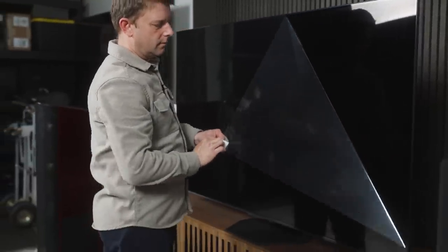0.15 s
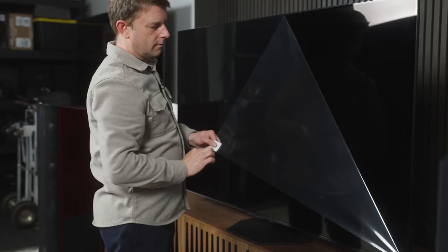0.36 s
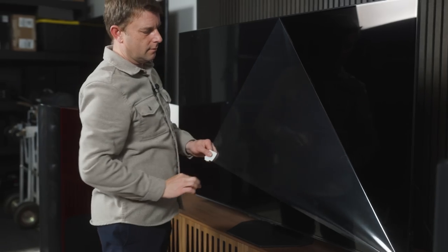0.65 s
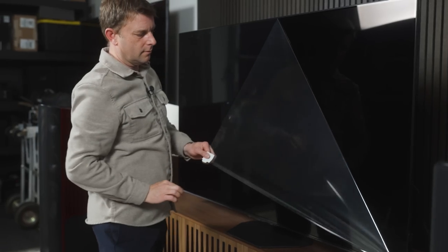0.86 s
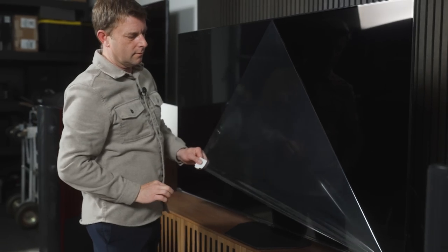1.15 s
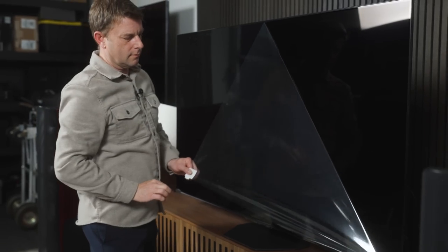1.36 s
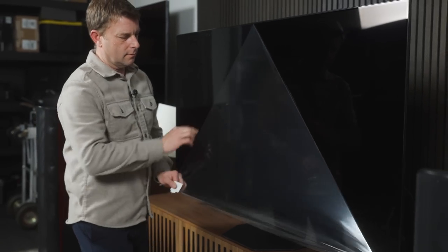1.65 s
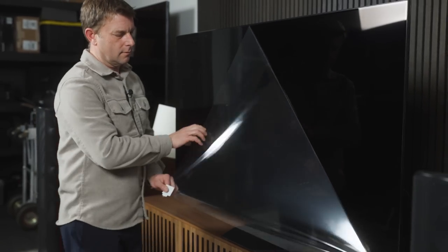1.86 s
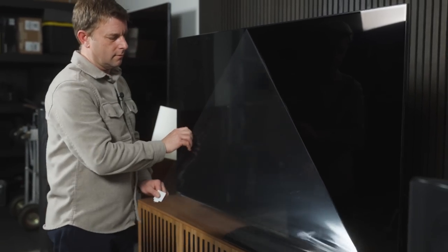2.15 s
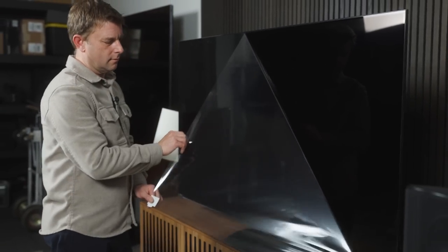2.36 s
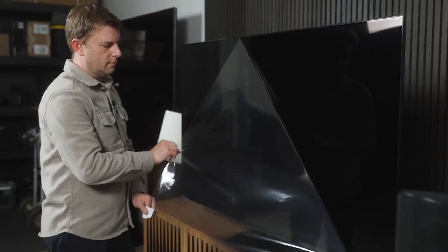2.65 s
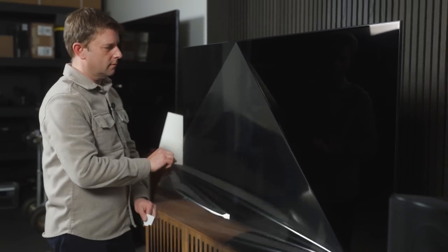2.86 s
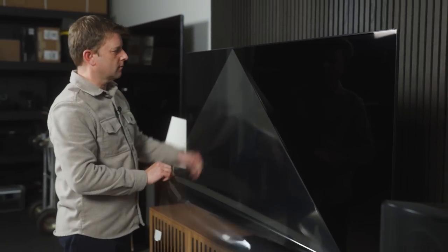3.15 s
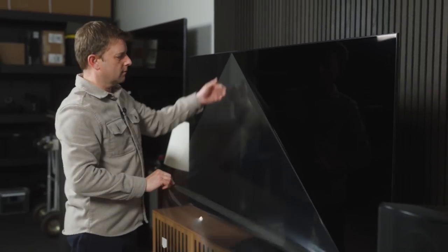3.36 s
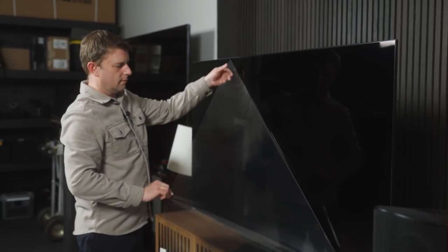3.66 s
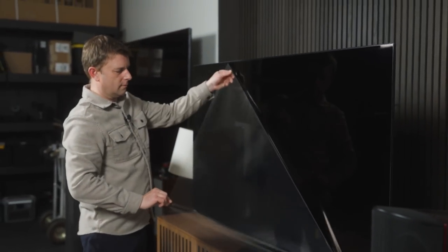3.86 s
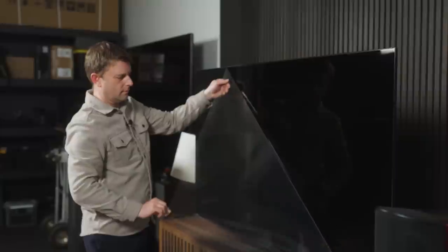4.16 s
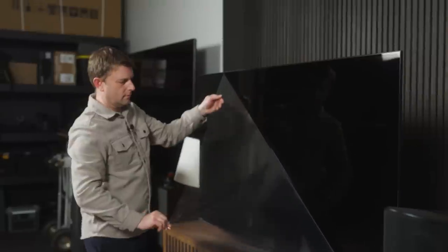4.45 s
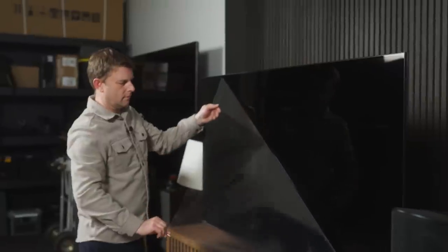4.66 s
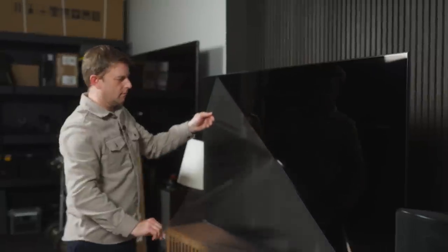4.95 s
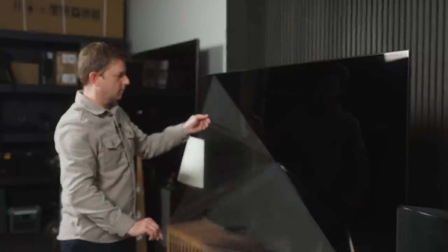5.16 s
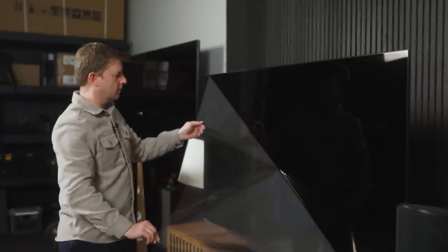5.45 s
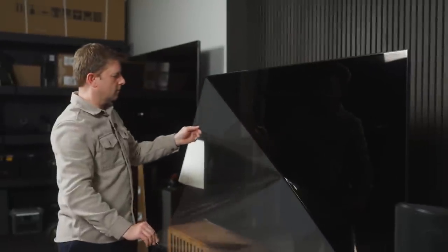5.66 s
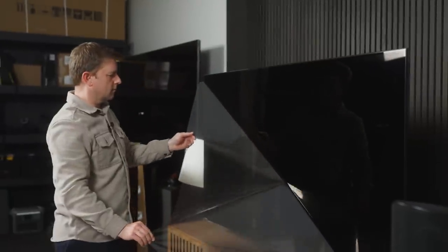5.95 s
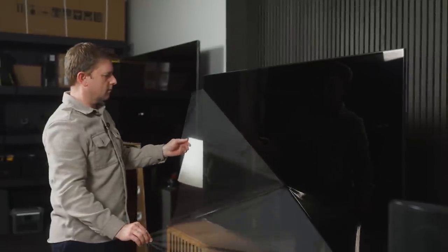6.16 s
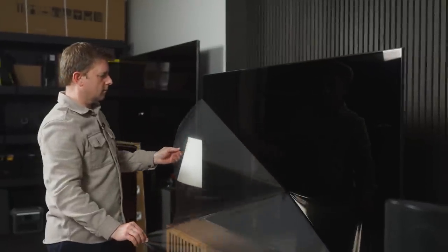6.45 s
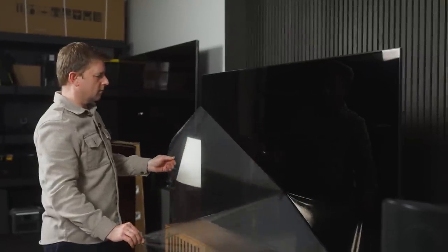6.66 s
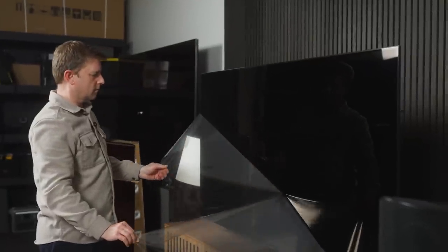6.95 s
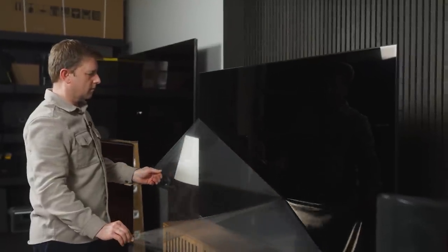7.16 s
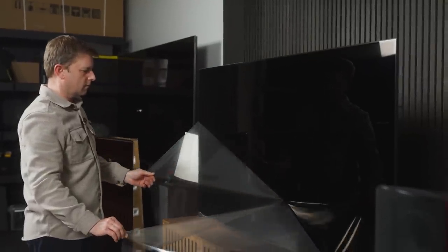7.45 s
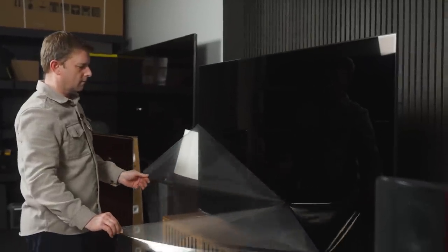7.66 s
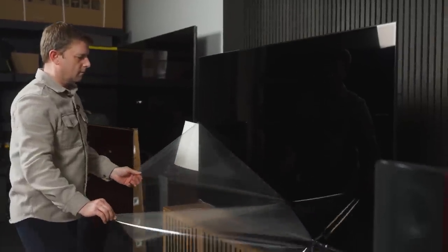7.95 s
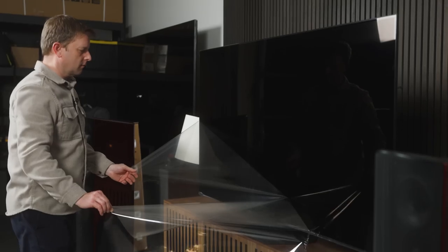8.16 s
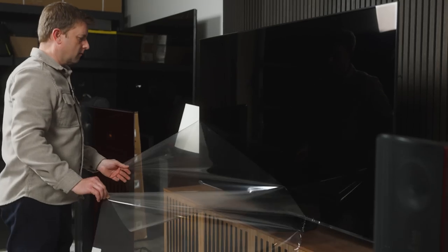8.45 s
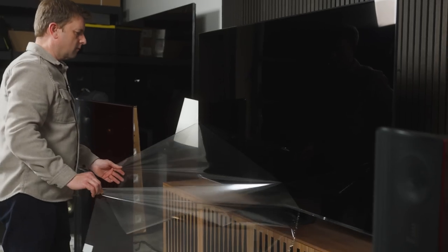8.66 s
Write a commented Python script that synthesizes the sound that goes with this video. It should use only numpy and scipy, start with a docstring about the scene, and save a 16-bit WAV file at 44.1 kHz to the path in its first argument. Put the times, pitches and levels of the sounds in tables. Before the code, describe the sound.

A protective plastic film is peeled from a large glass screen. Quiet ticks and soft handling rustle give way to bright adhesive snaps and a crackling rip with tiny squeaks. After a quieter pause the peel resumes in bursts, and the freed sheet rattles more fully, ending in loud, dense crinkling. Close clip-on microphone, small fairly dry room, very faint ventilation rumble and hiss.

```python
"""Protective plastic film is pulled off a large screen in a small, fairly dry room.
Adhesive bonds break as random pops: short rips first, then one long crackling peel driven by swells of effort.
The pops shake the freed sheet, which rattles like a drumskin; fast stick-slip gives gliding squeaks.
Buckling creases snap as short decaying cycles, loose film swishes as filtered grains, and tugs bump the sheet.
A wall echo and a diffuse tail surround it, over low ventilation rumble, faint hiss and mains hum."""
import sys
import numpy as np
from scipy import signal
from scipy.fft import rfft, irfft, next_fast_len
from scipy.io import wavfile
from scipy.ndimage import uniform_filter1d, map_coordinates

SR = 44100
rng = np.random.default_rng(int(sys.argv[2]) if len(sys.argv) > 2 else 0)


def materialize(psi):
    """Save the field psi as 16-bit PCM at rate SR to the path in sys.argv[1].

    A 1-D psi becomes a single channel; in a 2-D psi each row is a channel.
    """
    bounded = np.clip(np.atleast_2d(psi).T, -1, 1)
    quanta = np.round(bounded * 32767).astype(np.int16)
    wavfile.write(sys.argv[1], SR, quanta)


N = 388521  # samples
TOP_HZ = 16300  # upper limit of the sound

# short bursts of rattle and crackle, strong or faint: adhesive giving way, or loose film crinkling in
# the hands: (time [s], length [s], relative sheet level [dB], relative adhesive level [dB])
RIPS = [(0.116, 0.006, -55, -52.5), (0.129, 0.0075, -42, -46.5), (0.148, 0.0045, -52, -72),
        (0.447, 0.00509, -82, -67), (0.49, 0.025, -56, -82), (0.73, 0.01, -48, -43),
        (0.741, 0.0091, -37.5, -52.5), (0.794, 0.0042, -32, -31), (0.849, 0.009, -49, -29),
        (0.892, 0.0057, -38.5, -36), (0.944, 0.0077, -38.5, -33.5), (0.96, 0.008066, -54.5, -28),
        (0.988, 0.004, -32, -31), (1.015, 0.0044, -34, -26.5), (1.222, 0.006494, -46, -39.5),
        (1.25, 0.019, -54, -46.5), (1.2993, 0.003, -35, -29), (1.357, 0.0032, -51, -31.5),
        (1.718, 0.0022, -52, -34.5), (1.722, 0.0051, -35, -24), (1.856, 0.023, -33, -27.5),
        (1.898, 0.019, -39, -41), (1.928, 0.0031, -37, -29), (1.971, 0.0031, -51, -32),
        (1.996, 0.0056, -49, -29.5), (2.039, 0.0012, -29.5, -27), (2.063, 0.0021, -29.5, -26),
        (2.075, 0.0049, -40, -29), (2.086, 0.0029, -41, -26), (2.102, 0.0034, -36, -29),
        (2.152, 0.0053, -36, -28), (2.17, 0.0017, -36, -27), (2.191, 0.0033, -38, -32),
        (2.203, 0.0023, -42, -28), (2.24, 0.004, -45, -30.5), (2.288, 0.0059, -42, -29.5),
        (2.333, 0.0059, -43, -35), (2.388, 0.003, -37, -30.5), (2.435, 0.0073, -50, -39),
        (2.525, 0.004, -46, -35), (2.554, 0.0037, -39, -33), (2.596, 0.0063, -39.5, -43),
        (2.734, 0.017, -48.5, -51), (2.824, 0.008, -57, -54), (2.9323, 0.011, -46.5, -50.5),
        (3.161, 0.013, -46.5, -47), (3.275, 0.013, -61, -41.5), (3.301, 0.022, -63, -40.5),
        (3.397, 0.0043, -50, -38), (3.423, 0.014, -51.5, -40.5), (3.547, 0.0097, -44, -43),
        (3.56, 0.02, -43, -36.5), (3.62, 0.011, -46, -36.5), (3.708, 0.012, -40, -31.5),
        (3.754, 0.0077, -48, -32.5), (3.826, 0.012, -41.5, -32), (3.871, 0.013, -56, -35),
        (3.927, 0.011, -39.5, -32.5), (3.962, 0.018, -43.5, -32), (4.013, 0.015, -41.5, -33.5),
        (4.044, 0.01884, -43.5, -35.5), (4.116, 0.01062, -41.5, -34.5), (4.181, 0.0046, -37.5, -29.5),
        (4.429, 0.0084, -40, -42), (4.44, 0.0066, -35, -38), (4.452, 0.0092, -37.5, -39.5),
        (4.52, 0.0088, -54, -41.5), (4.548, 0.0079, -32, -43), (4.561, 0.0075, -36, -37),
        (4.604, 0.008, -30, -30.5), (4.669, 0.006, -31, -47), (4.716, 0.0051, -29.5, -45),
        (4.732, 0.004, -31.5, -42.5), (4.792, 0.008, -33.5, -43), (4.832, 0.006, -28, -30.5),
        (4.874, 0.013, -33.5, -38), (4.888, 0.00745, -34, -47.5), (4.907, 0.0095, -34, -36),
        (4.941, 0.0093, -34.5, -43.5), (4.989, 0.015, -36, -44), (5.018, 0.0036, -35.5, -30),
        (5.038, 0.011, -35, -42), (5.057, 0.012, -43, -35), (5.121, 0.018, -37.5, -45.5),
        (5.147, 0.031, -39, -49.5), (5.25, 0.0055, -35, -45.5), (5.304, 0.005, -38.5, -33),
        (5.363, 0.0063, -48, -47.5), (5.407, 0.01168, -37, -50), (5.429, 0.0081, -36.5, -44.5),
        (5.486, 0.01298, -40, -54.5), (5.518, 0.0046, -47, -49), (5.611, 0.0099, -41.5, -57),
        (5.668, 0.0092, -39, -57), (5.767, 0.011, -55, -46.5), (5.874, 0.0055, -49, -67.5),
        (5.946, 0.0046, -56.5, -89), (5.981, 0.011, -47.5, -43.5), (6.109, 0.01328, -75, -58),
        (6.132, 0.0091, -50.5, -40.5), (6.291, 0.013, -48, -49), (6.336, 0.013, -36, -47.5),
        (6.4, 0.0065, -33.5, -40), (6.429, 0.0057, -35, -40), (6.45, 0.017735, -34, -43.5),
        (6.543, 0.023, -37.5, -39), (6.618, 0.0042, -31, -33.5), (6.801, 0.01825, -31.5, -36.5),
        (6.989, 0.008, -37, -38), (7.084, 0.015, -36.5, -37.5), (7.145, 0.0025, -24.5, -30.5),
        (7.155, 0.0069, -36, -39), (7.222, 0.006, -42, -37), (7.244, 0.016, -33.5, -32),
        (7.277, 0.011, -33, -37), (7.33, 0.007, -35, -39), (7.412, 0.0045, -30, -29.5),
        (7.838, 0.0034, -34, -30), (7.867, 0.0031, -23.5, -27), (7.944, 0.004, -25, -29),
        (8.297, 0.0065, -28, -36), (8.542, 0.0052, -34.5, -38), (8.616, 0.0032, -25.5, -32)]
# colour of the crackle at the peel line: (frequency [Hz], relative level [dB])
ADHESIVE = [(200, -46), (1200, -46), (2600, -3.5), (4200, 7), (7000, 4.5), (10000, 4), (13000, 1),
            (16000, -9.5)]


def amp(db):
    """Decibels to gain."""
    return 10 ** (np.asarray(db) / 20)


def unit(x):
    """Scale to rms 1."""
    return x / np.sqrt(np.mean(x ** 2) + 1e-20)


def along(points, hz):
    """Read a (frequency, value) curve on a log frequency axis."""
    f, v = np.transpose(points)
    return np.interp(np.log(hz + 1), np.log(f + 1), v)


def add(track, s, sound):
    """Mix a sound into a track at time s."""
    part = track[max(round(s * SR), 0):][:len(sound)]
    part += sound[:len(part)]


def wobble(rate):
    """A smooth random curve, rate knots a second."""
    knots = rng.standard_normal(int(N * rate / SR) + 4)
    return map_coordinates(knots, [np.arange(N) * rate / SR], order=2)


def coloured(x, spectrum, size=2048):
    """Causal minimum-phase filter with the given (Hz, dB) spectrum."""
    cepstrum = irfft(np.log(amp(along(spectrum, np.fft.rfftfreq(size, 1 / SR)))))
    # folding the cepstrum forward in time makes the filter causal
    cepstrum[1:size // 2] *= 2
    cepstrum[size // 2 + 1:] = 0
    response = irfft(np.exp(rfft(cepstrum)))
    return signal.oaconvolve(x, response)[:N]


def around(x, hz, ratio):
    """A broad resonance from hz / ratio to hz * ratio."""
    ratio = max(ratio, 1.1)
    edges = [hz / ratio, min(hz * ratio, TOP_HZ)]
    return signal.lfilter(*signal.butter(1, edges, "band", fs=SR), x)


def above(x, hz):
    """High-pass at hz, held between 40 and 1200 Hz."""
    return signal.lfilter(*signal.butter(2, np.clip(hz, 40, 1200), "high", fs=SR), x)


def even(x, size=1100):
    """Keep the fine grain of a texture but hold its running rms, over size samples, near 1."""
    return x / np.sqrt(np.abs(uniform_filter1d(x ** 2, size)) + 1e-9 * np.mean(x ** 2))


def background():
    """Low ventilation rumble and faint hiss from coloured noise, with steady sines for mains hum."""
    # ventilation colour: (frequency [Hz], relative level [dB])
    air_colour = [(20, -9), (42, -8), (65, 0), (110, -12), (250, -26), (600, -33), (1200, -40), (2500, -47),
                  (11000, -47), (16000, -58)]
    # mains hum: (frequency [Hz], rms level [dB])
    hum_tones = [(59, -77), (120, -87)]
    t = np.arange(N) / SR
    hum = np.zeros(N)
    for hz, db in hum_tones:
        hum += amp(db) * np.sqrt(2) * np.sin(2 * np.pi * hz * t + rng.uniform(0, 2 * np.pi))
    air = amp(-71) * unit(coloured(rng.standard_normal(N), air_colour, size=8192))
    return hum + air


def room(x, delay=0.004, count=15, wall_s=0.019, wall_db=-21.5):
    """One near wall answers, then a diffuse tail: each band stores energy and lets it die away, the bass slowest."""
    # reverberation time: (frequency [Hz], 60 dB decay time [s])
    decay_times = [(100, 0.42), (260, 0.3), (700, 0.34), (1900, 0.2), (5000, 0.22107), (13000, 0.31)]
    # reverberation strength: (frequency [Hz], level [dB])
    wet_levels = [(100, 6), (600, -2.5), (2000, -6.5), (5000, -11), (14000, -13)]
    out = np.zeros(N)
    add(out, wall_s, amp(wall_db) * x)
    edges = np.geomspace(50, TOP_HZ, count + 1)
    for low, high in zip(edges, edges[1:]):
        band = signal.butter(3, [low, high], "band", fs=SR, output="sos")
        hz = np.sqrt(low * high)
        keep = amp(-2 * 60 / (along(decay_times, hz) * SR))  # share of energy kept per sample
        noise = rng.standard_normal(N)
        power = signal.sosfilt(band, x + 1e-9 * noise) ** 2
        energy = signal.lfilter([1 - keep], [1, -keep], power)
        tail = np.sqrt(energy) * unit(signal.sosfilt(band, noise))
        add(out, delay, amp(along(wet_levels, hz)) * tail)
    return out


def slackness():
    """How freely the sheet hangs, one value per sample."""
    # loosening of the sheet: (time [s], slackness [0-1])
    hanging = [(3.598, 0), (4.6, 0.46), (6.4, 0.27), (6.6, 0.85), (7.2, 1)]
    return np.clip(np.interp(np.arange(N) / SR, *np.transpose(hanging)), 0, 1)


def pops(rate, spread_db):
    """Tiny bonds break at random moments, a few of them much stronger than the rest."""
    breaks = rng.random(N) < rate / SR
    signs = rng.choice([-1, 1], N)
    return breaks * signs * amp(spread_db * np.clip(rng.standard_normal(N), -3, 3))


def bump(t60=0.06, ratio=1.7, tone=0.18):
    """A tug moves the whole sheet at once: soft low bumps that die away quickly."""
    # tugs on the whole sheet: (time [s], pitch [Hz], level of the dull part before decay [dB])
    tugs = [(0, 98, -49), (0.746, 300, -38), (0.812, 290, -41), (4.439, 190, -46), (4.606, 175, -43),
            (4.876, 175, -44), (5.125, 180.7, -44.5), (5.43, 189, -44), (5.671, 200, -50)]
    out = np.zeros(N)
    t = np.arange(SR // 4) / SR
    for s, hz, db in tugs:
        dull = unit(around(around(rng.standard_normal(len(t)), hz, ratio), hz, ratio))
        decay = amp(db - 60 * t / t60)
        add(out, s, decay * (tone * np.sin(2 * np.pi * hz * t) + dull))
    return out


def swish(level_db=0):
    """Loose film rubs on itself in soft swells of fine-grained hiss; a small fold gives a narrow scuff."""
    # rubbing as the hands shift: (middle [s], length [s], level [dB], lowest frequency [Hz])
    rubs = [(0.548, 0.044, -58, 100), (0.61, 0.047, -64, 99), (1.17, 0.036, -56.5, 150),
            (1.245, 0.034, -60.5, 304), (2.855, 0.056, -58, 500), (3.018, 0.0097, -51, 1300),
            (3.056, 0.039, -46, 1200), (3.309, 0.029, -46.5, 1200), (3.515, 0.059, -59.5, 600),
            (6.243, 0.03, -58.5, 500)]
    # colour of film on film: (frequency [Hz], relative level [dB])
    sliding = [(150, 0), (600, -1), (1000, -8), (1700, -1), (2400, -8.5), (3300, -12), (6000, -16),
               (10000, -33), (16000, -34)]
    t = np.arange(N) / SR
    out = np.zeros(N)
    flutter = amp(level_db + 1.8 * wobble(65))
    rub = flutter * even(coloured(pops(rate=18000, spread_db=11.0), sliding))
    for s, length, db, lowest_hz in rubs:
        near = np.abs(t - s) < 2 * length
        swell = np.exp(-2 * ((t[near] - s) / length) ** 2)
        out[near] += above(rub[near], lowest_hz) * amp(db) * swell
    return out


def snaps(level_db=0, cycles=0.45, shiver_db=-18, shiver_t60=0.012, lowest_hz=300):
    """A crease flips over in about two cycles and leaves the film shivering."""
    # buckling creases: (time [s], level ahead of the bass cut [dB], pitch [Hz])
    creases = [(0.4538, -33, 10420), (0.4932, -12, 10830), (0.67, -52, 7310), (0.7307, -24, 8980),
               (0.7451, -16, 6570), (0.7746, -7, 8200), (0.7984, -18.5, 4930), (0.825, -14.5, 7023),
               (0.8968, -4, 9100), (1.01, -11, 10010), (1.0196, -16.5, 6515), (1.038, -8, 5522),
               (1.2232, -13.5, 6900), (1.302, -15.5, 4900), (1.31, -22, 8010), (1.323, -26.5, 7000),
               (1.3584, -16.5, 5340), (1.689, -36.5, 6000), (1.724, -18.5, 3770), (1.7645, -7.5, 7973),
               (1.888, -17, 8000), (1.9049, -15.5, 6950), (2.365, -9, 9600), (2.5963, -12.5, 8320),
               (2.9297, -32, 12250), (3.04, -35, 10010), (3.062, -31, 5030), (3.369, -27, 10600),
               (3.483, -29, 6300), (3.4989, -18, 5750), (3.803, -24, 5080), (3.8998, -23.5, 5518),
               (4.0462, -12.5, 4900), (4.545, -11.5, 10160), (5.009, -22.5, 6939), (5.134, -7, 10510),
               (5.4048, -9, 10900), (6.2095, -33, 4860), (6.283, -34.5, 9990), (6.3128, -25.5, 6473),
               (6.393, -28, 8100), (6.6174, -15, 5893), (6.807, -15, 5350), (7.144, -14, 6157),
               (7.866, -7, 2323), (7.9442, -7.5, 2497), (7.9934, -8, 6070), (8.017, -14, 6998),
               (8.299, -21, 8057), (8.617, -13, 1776)]
    out = np.zeros(N)
    t = np.arange(SR // 30) / SR
    for s, db, hz in creases:
        u = t * hz / cycles  # the envelope peaks at u = 1
        phase = 2 * np.pi * cycles * (u - 1) + rng.normal(0, 0.66)
        flip = u * np.exp(1 - u) * np.cos(phase)
        shiver = unit(around(rng.standard_normal(len(t)), hz, 1.2)) * amp(shiver_db - 60 * t / shiver_t60)
        add(out, s - cycles / hz, amp(db + level_db) * (flip + shiver))
    # a small crease radiates little bass
    return signal.lfilter(*signal.butter(1, lowest_hz, "high", fs=SR), out)


def squeak(length, first_hz, last_hz, jitter=0.16, wander=0.035):
    """Slips follow each other fast enough to make a rough, gliding tone."""
    u = np.linspace(0, 1, max(int(length * SR), 16))
    drift = np.interp(u, np.linspace(0, 1, 8), rng.standard_normal(8))
    scatter = rng.standard_normal(SR // 10)[:len(u)]  # no two slips take the same time
    hz = first_hz * (last_hz / first_hz) ** u * (1 + wander * drift + jitter * scatter)
    phase = 2 * np.pi * np.cumsum(hz) / SR
    tone = np.zeros(len(u))
    for k in range(1, 8):
        overtone_hz = k * (first_hz + last_hz) / 2
        tone += amp(along(ADHESIVE, overtone_hz)) * (overtone_hz < TOP_HZ) * np.sin(k * phase)
    return unit(tone * np.abs(np.sin(np.pi * u)) ** .5)


def squeaks(level_db=0):
    """The longer squeals of film creeping off the glass by very fast stick-slip."""
    # squeals: (time [s], length [s], first pitch [Hz], last pitch [Hz], rms level [dB])
    squeals = [(0.851, 0.052, 1940, 1907, -38), (0.945, 0.012, 6181, 9400, -30.5),
               (0.964, 0.008, 4203, 4910, -35), (1.382, 0.011, 1969, 1841, -60),
               (1.78, 0.013, 13260, 9297, -37), (2.676, 0.02, 5600, 6800, -42),
               (3.424, 0.015, 1956, 1665, -49)]
    out = np.zeros(N)
    for s, length, first_hz, last_hz, db in squeals:
        add(out, s, amp(db + level_db) * squeak(length, first_hz, last_hz))
    return out


def chirps(count=170):
    """Stray squeaks of a few milliseconds, gliding up or down."""
    out = np.zeros(N)
    for when, life, pitch, glide in rng.random((count, 4)):
        hz = 5500 + 6500 * pitch
        add(out, when * N / SR, squeak(0.0041 + 0.0087 * life, hz, hz * 2 ** (glide - .5)))
    return out


def patchy(x, depth_db, size):
    """The film's folds keep shifting, so each moment rings at other frequencies."""
    z = signal.stft(x, nperseg=size)[2]
    field = uniform_filter1d(rng.standard_normal(z.shape), size=5, axis=0)
    field = uniform_filter1d(field, size=5, axis=1)
    return signal.istft(z * amp(depth_db * unit(field)), nperseg=size)[1][:N]


def sheet(drive):
    """The freed film radiates the pops; its voice shifts as it grows wide and slack."""
    # voice of the sheet under tension: (frequency [Hz], relative level [dB])
    taut_voice = [(35, -40.5), (60, -5), (100, -10), (180, -1), (310, -2), (450, -1), (1000, -4.5),
                  (1500, -4.5), (2100, -0.5), (3000, -9.5), (5000, -25), (16000, -61.5)]
    # voice of the sheet hanging wide: (frequency [Hz], relative level [dB])
    slack_voice = [(35, -37), (60, -20), (100, -16), (170, -8), (380, -6), (600, 0), (900, -1.5),
                   (1550, 1.5), (2100, -2.5), (3000, -15), (5000, -29), (16000, -87)]
    slack = slackness()
    taut_part = (1 - slack) * unit(coloured(drive, taut_voice))
    slack_part = slack * unit(coloured(drive, slack_voice))
    return even(patchy(taut_part + slack_part, depth_db=2.0, size=256))


def adhesive(drive):
    """The bright crackle straight from the peel line."""
    return even(patchy(coloured(drive, ADHESIVE), depth_db=5.0, size=128), size=2200)


def crackles(middle_hz=5800, scatter=0.45, life=0.00023, rough=0.28, spread_db=4.0, count=1300):
    """Threads of adhesive or small wrinkles snap: each is a ragged, brief ring at its own pitch."""
    t = np.arange(SR // 200) / SR
    pitch, size, long = np.clip(rng.standard_normal((count, 3)), -2.2, 2.2).T[:, :, None]
    hz = np.minimum(middle_hz * np.exp(scatter * pitch), TOP_HZ)
    u = t / (life * 2 ** (long / 2))
    raggedness = rough * np.cumsum(rng.standard_normal((count, len(t))), axis=1)
    phase = 2 * np.pi * hz * t + raggedness
    grains = amp(spread_db * size) * u * np.exp(-u) * np.sin(phase)
    where = rng.integers(0, N, (count, 1)) + np.arange(len(t))
    scattered = np.bincount(where.ravel(), grains.ravel(), N)[:N]
    return unit(above(scattered, middle_hz / 2))


def surges(rate, life, steady):
    """The peel line catches and jumps ahead: quick swells of gain on top of a steady share."""
    jumps = np.abs(pops(rate, spread_db=5.0))
    decay = np.exp(-np.arange(SR // 20) / (life * SR))
    swells = signal.oaconvolve(jumps, decay * (1 - decay))[:N]
    return even(steady + unit(swells), size=9000)


def pulling(ease=1.5, roundness=1.4):
    """Guide levels in dB of sheet rattle and adhesive crackle: most pulls are arches of effort."""
    # a pull whose end precedes its fastest moment only rises, lowered by the full fall, then stops:
    # (start [s], fastest [s], end [s], relative rattle level [dB], crackle over rattle [dB], swell [dB])
    pulls = [(0.745, 0.8, 0.85, -45, -20, 5.5), (1.718, 1.767, 2.6, -49.5, 2, 3),
             (1.854, 2.18, 2.8, -42, 3.5, 5), (2.552, 2.685, 2.88, -47.5, -8, 9),
             (3.35, 3.414, 3.54, -61, -3, 1.5), (3.548, 4.1, 4.21, -45, -8, 6),
             (4.564, 4.97, 4.95, -52, -3, 6), (6.286, 6.426, 6.56, -42, -16, 5.5),
             (6.548, 7.872, 9.05, -31.5, -9, 14.5), (7.06, 7.2, 7.4, -36, -11.5, 2.5),
             (7.999, 8.183, 8.1, -33, -18, 3), (8.5, 8.712, 8.9, -34.5, -9.5, 5)]
    t = np.arange(N) / SR
    rattle, crackle = np.full((2, N), -120.)
    for start, fastest, end, db, crisp_db, swell_db in pulls:
        on = (t >= start) & (t < end)
        before = np.clip((fastest - t[on]) / (fastest - start), 0, 1)
        after = np.clip((t[on] - fastest) / (end - fastest), 0, 1)
        # ease: the fall over the swell; roundness: exponent of the curve
        effort = db - swell_db * (before ** roundness + ease * after ** roundness)
        rattle[on] = np.maximum(rattle[on], effort)  # the stronger of overlapping pulls wins
        crackle[on] = np.maximum(crackle[on], effort + crisp_db)
    return rattle, crackle


def jerks(count=400):
    """Stick and slip: the harder the pull, the faster and shorter its small jerks. Rows as in RIPS."""
    base_rate, base_db, doubling_db = 26, -42, 10  # jerks a second at a rattle level; dB that double it
    base_s, rest_s = 0.0073, 0.014  # typical length at that rate; no small jerk this near a row of RIPS
    unevenness, spread_db = 0.25, 2
    sheet_db, crackle_db = 0.5, 5.5  # a small jerk over the steady pull
    rattle, crackle = pulling()
    late, strong, crisp, long = rng.standard_normal((count, 4)).T
    rate = base_rate * 2 ** ((rattle - base_db) / doubling_db)
    # a jerk falls due each time the summed rate passes about one more whole slip
    slips = np.searchsorted(np.cumsum(rate) / SR, np.arange(count) + .5 + unevenness * late)
    listed = np.transpose(RIPS)[0]
    rows = []
    for i, a, b, c in zip(slips, strong, crisp, long):
        if i < N and np.abs(listed - i / SR).min() > rest_s:
            length = base_s * np.sqrt(base_rate / rate[i]) * 2 ** (c / 2)
            sheet_level = rattle[i] + sheet_db + spread_db * a
            crackle_level = crackle[i] + crackle_db + spread_db * (a + b / 2)
            rows.append((i / SR, length, sheet_level, crackle_level))
    return rows


def squealing(tear, length, slack, typical_hz=5170, octaves=0.45, squeal_db=-2):
    """A burst in taut film carries a brief gliding squeal, each at its own pitch."""
    first_hz, last_hz = typical_hz * 2 ** (octaves * np.clip(rng.standard_normal(2), -2, 2))
    tone = squeak(np.clip(1.3 * length, .002, .018), first_hz, last_hz)
    out = tear / (np.linalg.norm(tear) + 1e-20)
    add(out, 0, amp(squeal_db) * (1 - slack) ** 2 * tone / np.linalg.norm(tone))
    return out


def rips(sheet_db=-2.0, crackle_db=-1.5, rise=0.15, fall=0.87, ending=1.5, ratio=2.24, glide=1.08, spread=1.0):
    """Bursts are avalanches of pops that swell and stop; film carries high notes first, so knocks drop in pitch."""
    rip_hz, crisp_db_per_octave = 1230, 21  # sheet pitch; crisper bursts knock the sheet higher
    # a weak burst moves only a small patch of film, which gives no bass
    patch_hz, patch_at_db, patch_db_per_octave = 159, -39, 6.5
    drive = pops(rate=9000, spread_db=4.5)
    out = np.zeros(N)
    body, crisp, slack = sheet(drive), adhesive(drive), slackness()
    for s, length, rattle, crackle in RIPS + jerks():
        count, start = max(length * SR, 60), round(s * SR)
        hz = rip_hz * 2 ** ((crackle - rattle) / crisp_db_per_octave)
        u = np.arange(min(int(4 * count), N - start)) / count
        shape = (1 - np.exp(-u / rise)) * np.exp(-fall * u ** ending)
        shake = shape * body[start:][:len(u)]
        tear = shape * crisp[start:][:len(u)]
        late = np.minimum(u, 1)
        knock = around((1 - late) * shake, hz * glide, ratio) + around(late * shake, hz / glide, ratio)
        knock += spread * (1 - slack[start]) * shake  # only taut film shakes as a whole
        # tension spreads a burst over more film, so its knock reaches lower
        reach = np.interp(slack[start], [0, .35], [.35, 1])
        knock = above(knock, reach * patch_hz * 2 ** ((patch_at_db - rattle) / patch_db_per_octave))
        tear = squealing(tear, length, slack[start])
        for sound, db in (knock, rattle + sheet_db), (tear, crackle + crackle_db):
            # equal energy for equal length and level
            level = np.sqrt(len(u) / 4 / (np.sum(sound ** 2) + 1e-20))
            add(out, s, amp(db) * sound * level)
    return out


def peel(sheet_db=-3, crackle_db=-5.5, chirp_db=0, tick_db=-11, thread_db=-6, wrinkle_db=-6,
         patter_db=-3.5, clump_db=5.5):
    """Steady pulling: clumps of fine pops along the peel line, with sharper ticks among them."""
    t = np.arange(N) / SR
    drive = pops(rate=9000, spread_db=4.0)
    body, crisp = amp(pulling())
    clumps = clump_db * wobble(300)
    surge = surges(rate=67, life=0.0032, steady=1.0)
    ticks = unit(pops(rate=160, spread_db=3.5))
    # the same pops and ticks that hiss at the peel line also shake the sheet
    shaking = unit(drive * amp(0.3 * clumps)) + amp(patter_db) * ticks
    out = body * amp(sheet_db) * unit(np.sqrt(surge)) * sheet(shaking)
    out += crisp * amp(crackle_db) * surge * adhesive(drive * amp(clumps))
    out += crisp * amp(tick_db) * unit(coloured(ticks, ADHESIVE))
    out += crisp * amp(thread_db) * crackles()
    # wrinkles flick in the slack sheet
    wrinkles = crackles(middle_hz=1543, scatter=0.25, life=0.00059, count=1500)
    out += body * amp(wrinkle_db) * slackness() * wrinkles
    # stray squeaks soften as the film loses tension
    tension = np.interp(t, [2.8, 4.6], [1, .3])
    return out + amp(chirp_db) * tension * crisp * chirps()


def scene():
    """The film in its room."""
    film = peel() + rips() + squeaks() + snaps() + swish() + bump()
    return (film + room(film) + background())[None]


def record(dry):
    """A clip-on microphone, its treble ended by a steep low-pass at TOP_HZ."""
    m = next_fast_len(N + 8192)
    passed = np.clip((TOP_HZ - np.fft.rfftfreq(m, 1 / SR)) / 500 + .5, 0, 1)
    return irfft(rfft(dry, m) * passed, m)[:, :N]


dry = scene()
out = record(dry)
materialize(out)
```